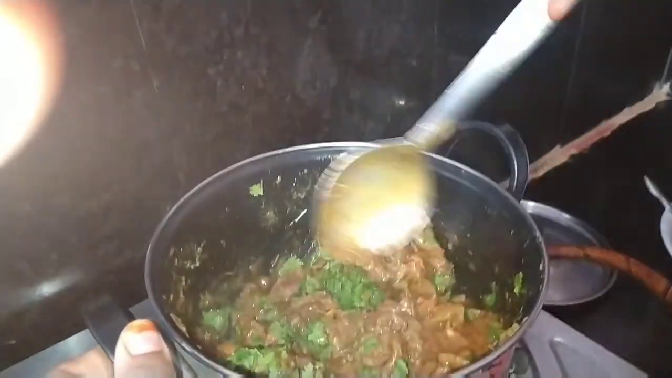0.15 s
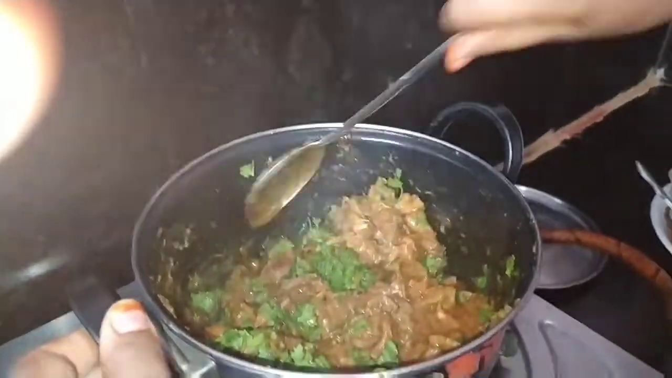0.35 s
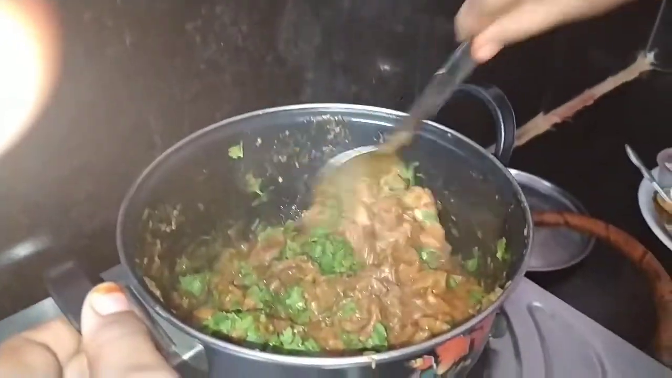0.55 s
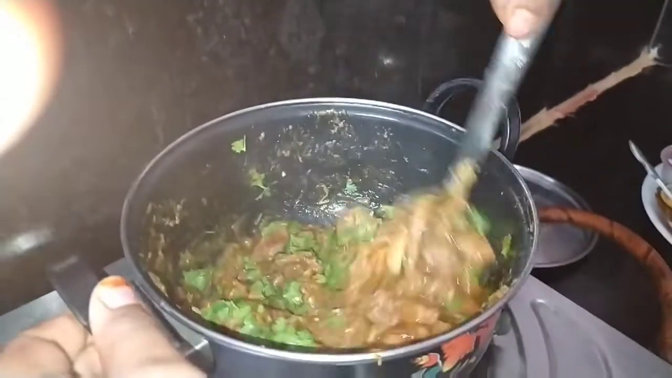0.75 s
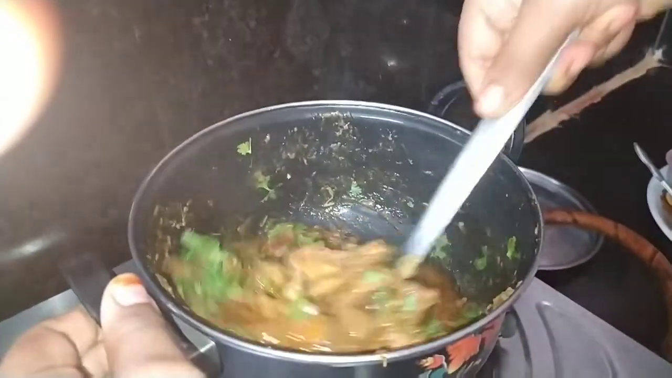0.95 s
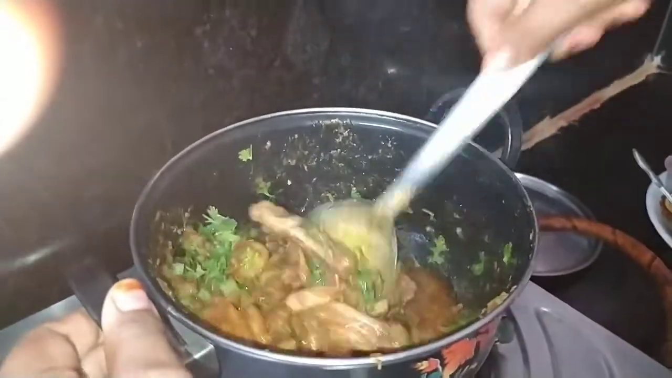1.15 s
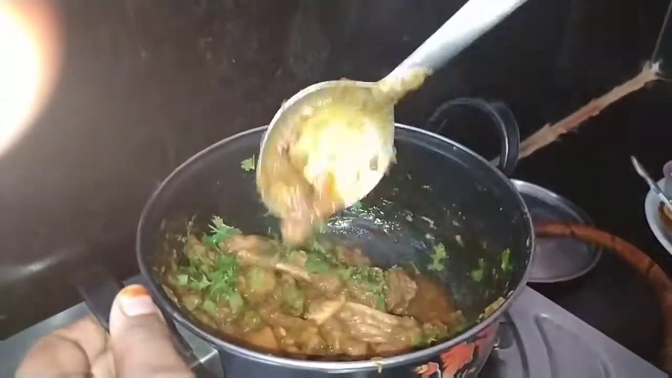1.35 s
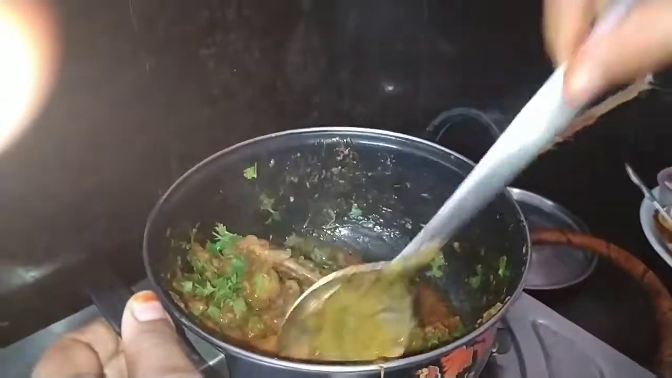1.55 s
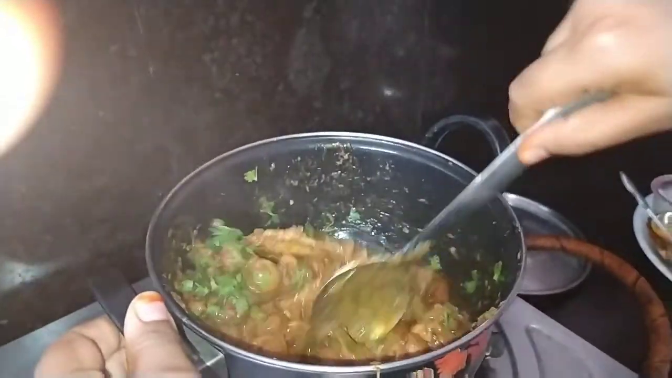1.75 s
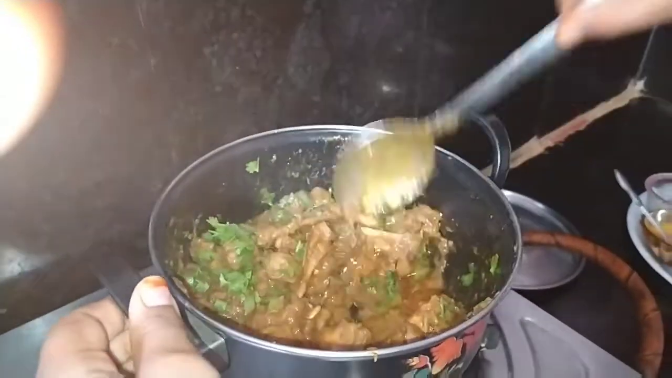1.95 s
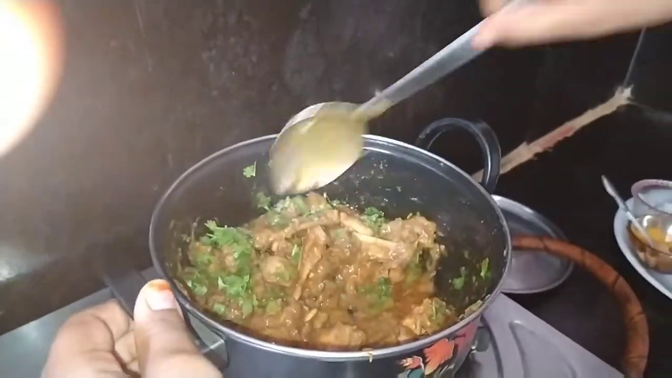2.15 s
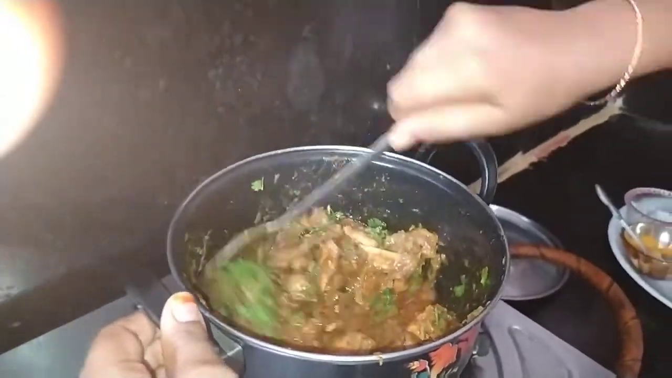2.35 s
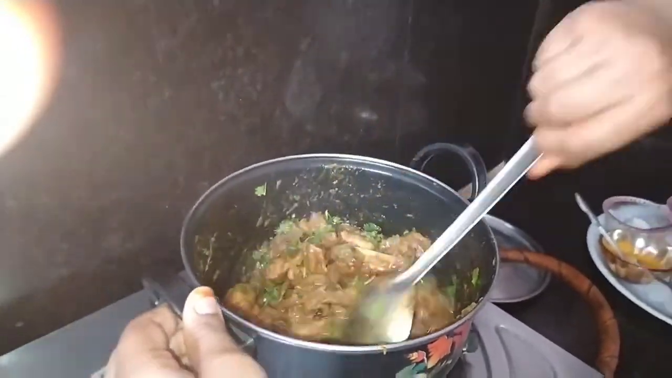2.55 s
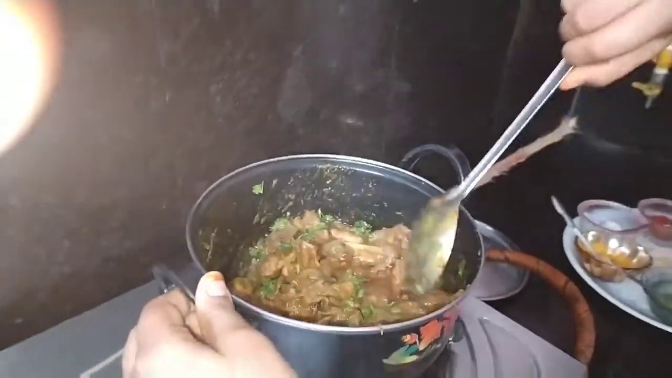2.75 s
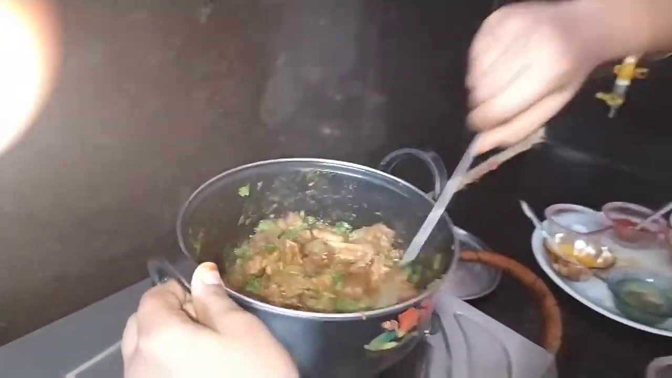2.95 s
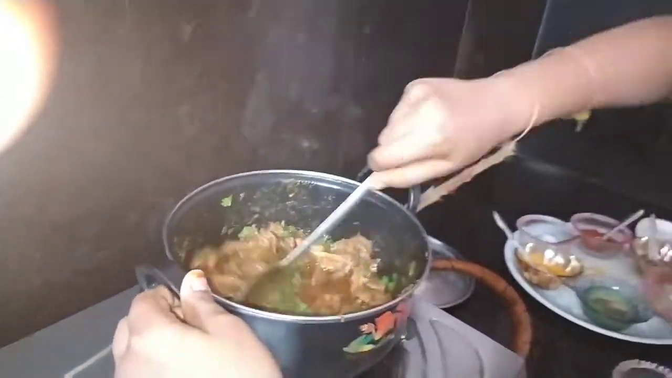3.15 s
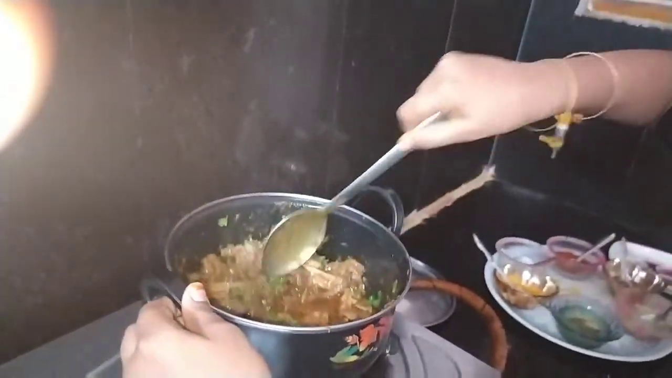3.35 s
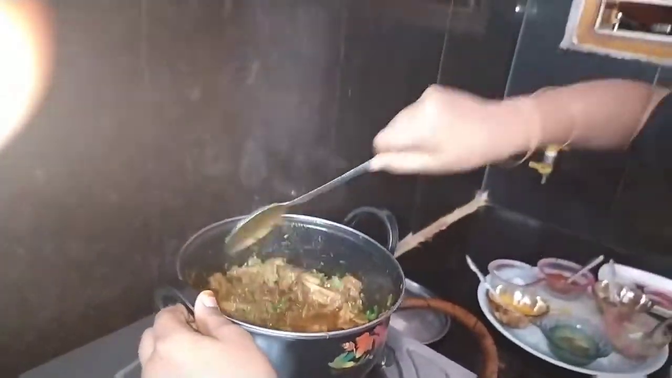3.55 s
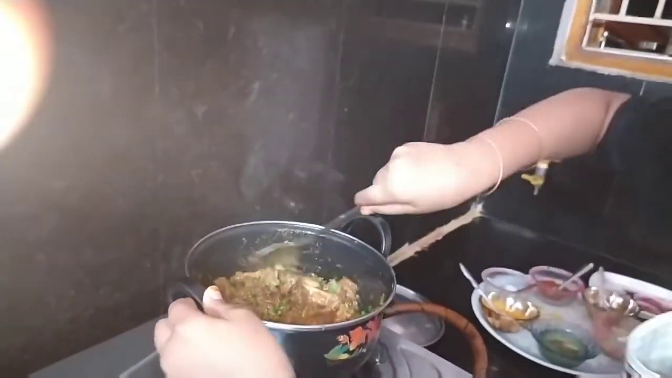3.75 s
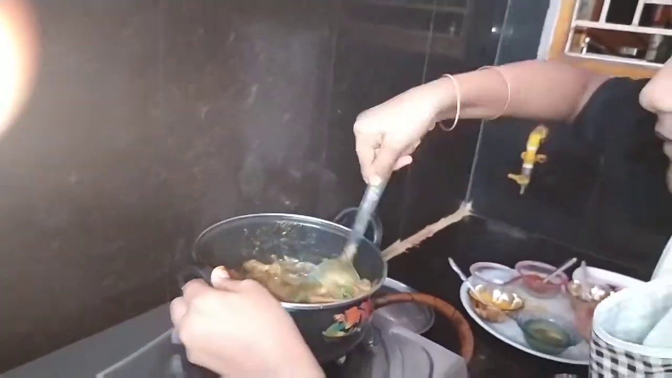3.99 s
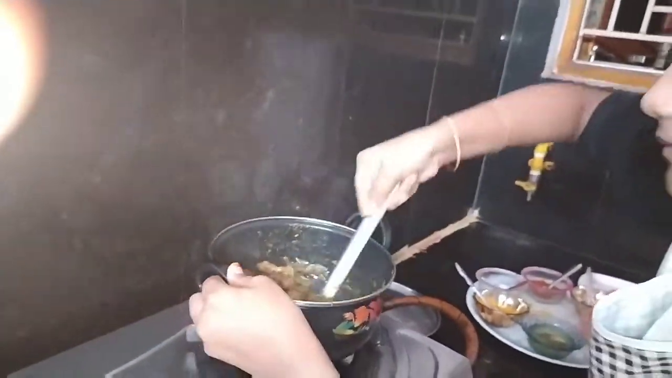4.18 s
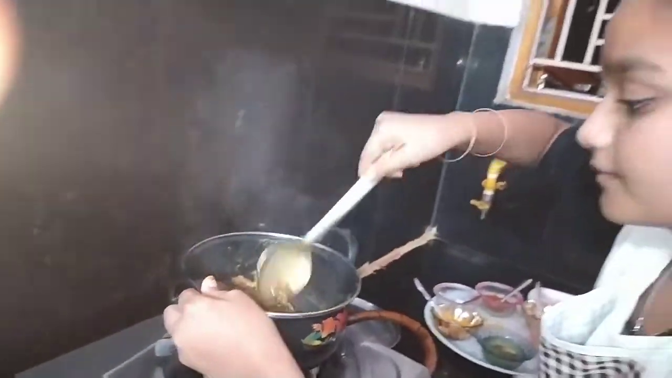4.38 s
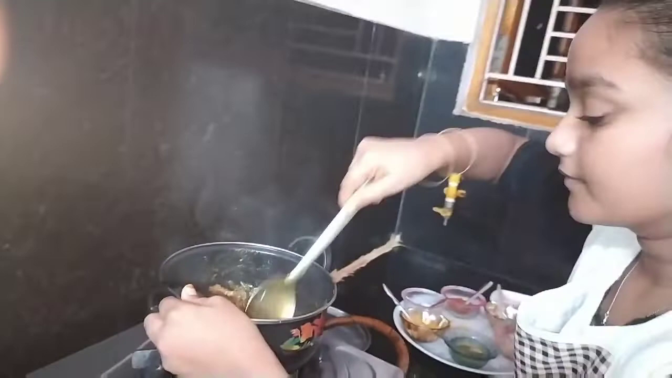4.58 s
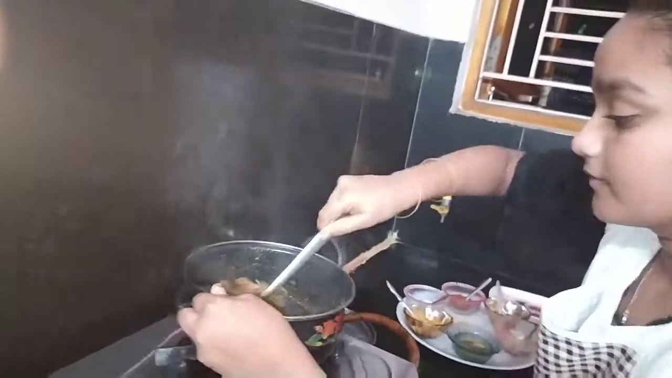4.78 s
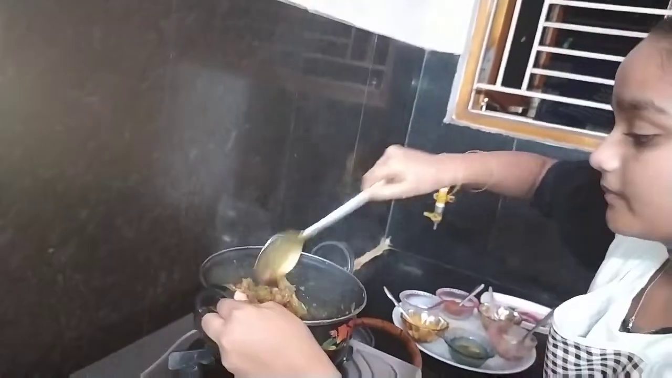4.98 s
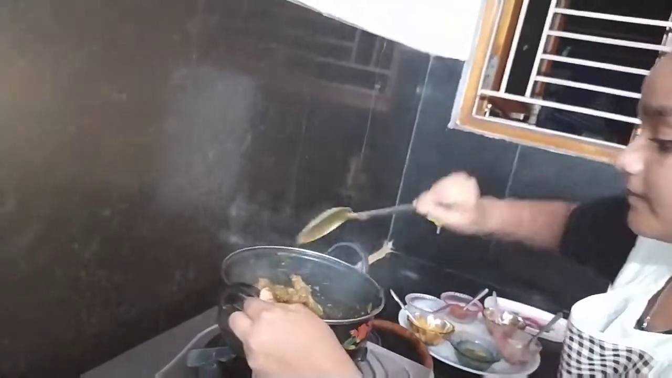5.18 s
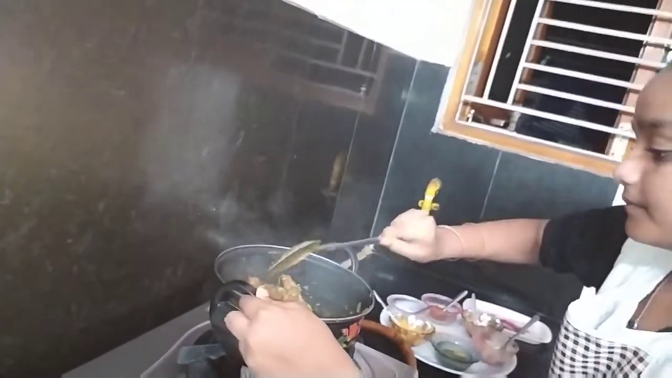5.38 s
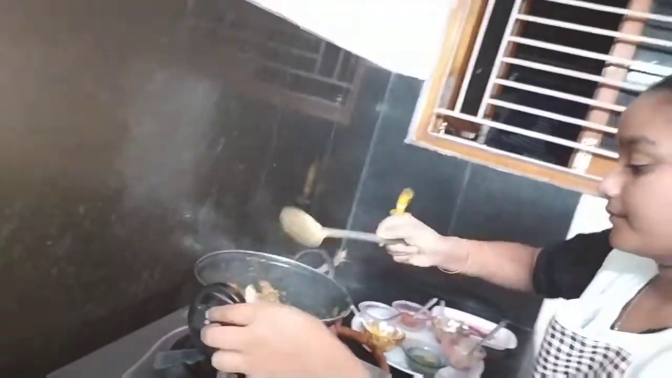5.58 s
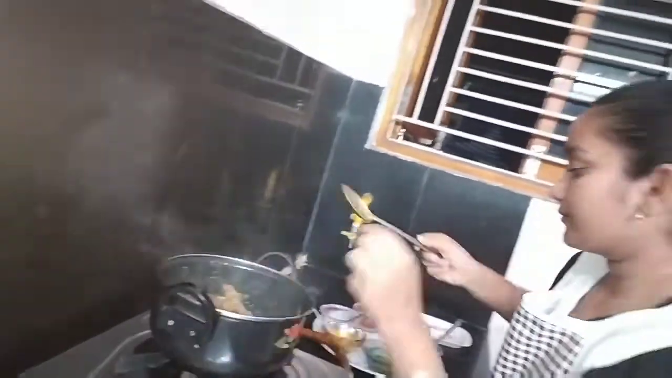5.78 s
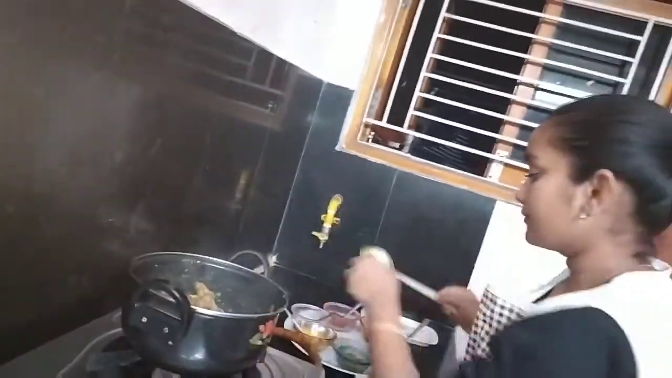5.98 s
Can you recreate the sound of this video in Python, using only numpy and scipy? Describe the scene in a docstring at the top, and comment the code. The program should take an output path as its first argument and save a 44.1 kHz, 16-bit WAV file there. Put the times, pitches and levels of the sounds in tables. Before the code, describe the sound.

A steel ladle stirs thick curry in a metal pan. Faint sticky smacks come first, then gritty scrapes and light clinks, a loud ringing knock just after two seconds, more drags and wet spits, then sparser knocks with soft pan thuds. Close stereo phone microphone in a tiled kitchen, stronger on the right, slowly backing away, over low hum and soft hiss.

```python
"""Faint sauce smacks over a low hum and soft hiss, then a steel ladle knocks and scrapes a metal pan of thick curry.
Knocks, scrapes and pan thuds excite banks of decaying modes of ladle, pan wall and pan base.
Smacks are short pitched noise spits, squeaks are narrow noise bands; a low push hits the right microphone once.
A tiled kitchen answers with sparse echoes; the air is shaped noise, the hum is drifting sines."""
import sys
import numpy as np
from scipy import signal
from scipy.fft import rfft, irfft, next_fast_len
from scipy.io import wavfile
from scipy.ndimage import uniform_filter1d

SR = 44100
rng = np.random.default_rng(int(sys.argv[2]) if len(sys.argv) > 2 else 0)


def materialize(psi):
    """Save the field psi as 16-bit PCM at rate SR to the path in sys.argv[1].

    A 1-D psi becomes a single channel; in a 2-D psi each row is a channel.
    """
    bounded = np.clip(np.atleast_2d(psi).T, -1, 1)
    quanta = np.round(bounded * 32767).astype(np.int16)
    wavfile.write(sys.argv[1], SR, quanta)


def level_to_linear(level):
    """Convert decibel levels to linear amplitude factors, elementwise."""
    exponent = np.asarray(level, float) / 20
    return 10 ** exponent


N = 265669  # samples


def evened(x):
    """Scales to an rms of 1."""
    return x / np.sqrt(np.mean(x ** 2) + 1e-20)


def crest(x, size=100):
    """Peak height as the ear takes it: from the power over a short window."""
    return 2.5 * np.sqrt(uniform_filter1d(x ** 2, size).max())


def read(points, hz):
    """Interpolates a curve over log frequency."""
    point_hz, value = np.transpose(points)
    return np.interp(np.log(hz + 1), np.log(point_hz + 1), value)


def add(mix, start_s, sound):
    """Adds a sound in place, cut at the end of the mix."""
    part = mix[..., round(start_s * SR):][..., :sound.shape[-1]]
    part += sound[..., :part.shape[-1]]


def pair(x, left_right_db):
    """Places a sound between the microphones by level."""
    return x * level_to_linear(np.array([[.5], [-.5]]) * left_right_db)


def ring(x, hz, width_hz):
    """One mode: a click of height 1 rings as a dying wave of height 1, with no steady part."""
    radius, turn = np.exp(-np.pi * width_hz / SR), 2 * np.pi * hz / SR
    poles = [1, -2 * radius * np.cos(turn), radius * radius]
    return signal.lfilter([.5, 0, -.5], poles, x) / max(np.sin(turn), 1 - radius)


def favoured(modes, loud_hz, favour_db=8.0, spread=0.12):
    """The spot of contact favours the modes near one pitch."""
    return [level_to_linear(db + favour_db * np.exp(-(np.log(hz / loud_hz) / spread) ** 2)) for hz, _, db in modes]


def facing(rings, flip):
    """Every other mode reaches the right port at another strength, sometimes with its sign turned."""
    left = rings.sum(0)
    return np.array([left, left - flip * rings[1::2].sum(0)])


def struck(modes, db, loud_hz, contact_ms, flip, favour_db=11.0):
    """A rattling contact sets each mode ringing, a little detuned by the sauce on the metal."""
    t = np.arange(round(.3 * SR)) / SR
    touch = rng.standard_normal((len(modes), len(t))) * t * np.exp(-1000 * t / contact_ms)
    detune = 1 + 0.0052 * rng.standard_normal(len(modes))
    rings = np.array([ring(x, hz * c, width) for x, c, (hz, width, _) in zip(touch, detune, modes)])
    rings /= np.linalg.norm(rings, axis=1)[:, None]
    size = [g * np.sqrt(1 / width) for g, (_, width, _) in zip(favoured(modes, loud_hz, favour_db), modes)]
    sides = facing(rings * np.c_[size], flip)
    return level_to_linear(db) * sides / crest(sides[0], size=round(contact_ms * 150))


# resting modes of ladle and pan wall: (pitch_hz, width_hz, relative_level_db)
LADLE = [(5130, 2100, 12), (5620, 260, -5), (6280, 120, -1.5), (6575, 125, -0.5), (6974, 570, 10.5),
         (7570, 290, 7.5), (8400, 330, -1), (9200, 69, -6.5), (8960, 1100, 6.5), (9800, 72, 3),
         (10270, 230, -3.5), (11500, 1200, 15.5), (13260, 1390, -43), (6690, 4100, 11)]
WALL = [(1237, 380, 9.5), (1600, 100, 9), (1860, 440, 12.5), (2210, 300, 15), (2540, 60, 3),
        (2852, 340, 20.5), (3456, 540, -0.5), (4210, 200, 11), (2000, 6650, 27)]
# ladle knocks: (start_s, ladle_level_db, wall_re_ladle_db, loudest_ladle_hz, loudest_wall_hz, left_right_db)
KNOCKS = [(0.8504, -14.5, 2, 9500, 1550, -4), (1.793, -20.5, -1.5, 9120, 2450, -1),
          (1.8262, -11, -1.5, 9560, 1240, 0.5), (2.213, -0.5, -3, 6910, 2390, 10),
          (2.9519, -8.5, 3.5, 8770, 2150, 3.5), (3.662, -14.5, -13, 9400, 1600, 3.5),
          (4.7394, -5, 1, 9620, 2300, 6), (5.7111, -25, 4, 9200, 1770, 0.5),
          (5.728, -22, -3, 10200, 1250, 3.5)]
KNOCK_ROOM_DB, ROOM_DB_PER_S = -9.5, 1.52  # the phone backs away: knocks grow roomier


def knocks():
    """Steel on steel rings ladle and pan wall at once."""
    for start_s, ladle_db, wall_db, ladle_hz, wall_hz, left_right_db in KNOCKS:
        ladle = struck(LADLE, ladle_db, ladle_hz, contact_ms=0.81, flip=1.43)
        wall = struck(WALL, ladle_db + wall_db, wall_hz, contact_ms=1.0, flip=0.95)
        yield start_s, pair(ladle + wall, left_right_db), KNOCK_ROOM_DB + ROOM_DB_PER_S * start_s


# resting modes of the pan base: (pitch_hz, width_hz, relative_level_db)
BASE = [(201, 30.2, -4), (258, 8.8, 7), (305.8, 12, 2), (338.8, 21, 7), (405, 65, -6), (500, 42, 10.5),
        (583, 23, 1.5), (688, 48, 9), (800, 88, 12), (916, 106, 16), (594, 810, 19)]
USUAL_DB = -49  # ladle level of usual pressure
SAUCE_DAMPING = 1.29  # how much wider the modes are under the sliding load
HOLLOW_DB = -10.5  # lowest pan modes under a stroke, re pan base


def stroke(rows, wall_db, wall_hz, base_db, wall_lags, grit_per_s=9000, grit_db=4.0):
    """Grit under the sliding rim: dense uneven clicks into the modes, detuned by the load of sauce."""
    s, level_db = np.transpose(rows)
    t = np.arange(s[0], s[-1] + .08, 1 / SR)
    n = len(t)
    db = np.interp(t, s, level_db)
    wall_db = wall_db - wall_lags * (db - USUAL_DB)
    grit = rng.standard_normal(n) * (rng.random(n) < grit_per_s / SR)
    grit *= level_to_linear(grit_db * np.minimum(rng.exponential(1, n), 2))
    judder = level_to_linear(0.75 * evened(uniform_filter1d(rng.standard_normal(n), 400)))  # the rim sticks and slips
    touch = np.clip((t - s[0]) / 0.0011, 0, 1) * np.clip((s[-1] - t) / 0.0081, 0, 1)
    parts = [(LADLE, 0, 9500, 1.6), (WALL, wall_db, wall_hz, 1.6),
             (BASE[5:], wall_db + base_db, 650, .9), (BASE[1:4], wall_db + base_db + HOLLOW_DB, 300, .2)]
    out = np.zeros((2, n))
    for modes, rel_db, loud_hz, flip in parts:
        # the moving rim finds other modes
        wander = evened(uniform_filter1d(rng.standard_normal((len(modes), n)), 1500, axis=1))
        gains = [g * level_to_linear(4 * v) for g, v in zip(favoured(modes, loud_hz), wander)]
        widths = [width * SAUCE_DAMPING for _, width, _ in modes]
        energy = sum(g ** 2 * SR / (4 * np.pi * width) for g, width in zip(gains, widths))
        drive = evened(grit * judder) * touch * level_to_linear(db + rel_db) / np.sqrt(energy)
        detune = 1 + 0.028 * rng.standard_normal(len(modes))
        rings = [ring(drive * g, mode[0] * c, width) for g, c, mode, width in zip(gains, detune, modes, widths)]
        out += facing(np.array(rings), flip)
    return out


# long drags along the pan, pressure as it is heard: per drag, rows of (time_s, ladle_level_db)
DRAGS = [
    [(.665, -47.5), (.695, -39.5), (.72, -48.5), (.762, -45.5), (.775, -42), (.805, -36), (.83, -47.5),
     (.865, -54), (.9, -66), (.95, -47.5), (1.016, -48.5), (1.09, -73), (1.38, -70.5)],
    [(2.26, -48), (2.34, -44), (2.358, -34.5), (2.412, -40), (2.425, -31.5), (2.47, -30)],
    [(2.965, -44), (3.0, -53.5), (3.018, -34.5), (3.04, -51.5), (3.09, -41), (3.105, -43), (3.15, -41),
     (3.2, -66), (3.26, -66)],
    [(3.958, -46), (4.01, -50.5), (4.09, -43), (4.115, -56), (4.13, -44), (4.22, -51.5), (4.3, -66)],
]
# spot of each drag: (wall_re_ladle_db at usual pressure, loudest_wall_hz, base_re_wall_db)
DRAG_SPOTS = [(-5.5, 1880, -17.5), (-9, 2700, -35.5), (-6.5, 1950, -15.5), (-5.5, 1810, -21)]


def drags():
    """Long strokes; pressed harder than usual, the wall gains less than the ladle."""
    for rows, spot in zip(DRAGS, DRAG_SPOTS):
        yield rows[0][0], stroke(rows, *spot, wall_lags=0.22), -7


# short swipes of the rim: (start_s, length_s, ladle_level_db, wall_re_ladle_db, loudest_wall_hz)
SWIPES = [(0.516, 0.09, -38, -17, 2600), (.643, .018, -20.5, -21, 2780), (1.574, 0.059, -54.5, -8.5, 2000),
          (1.668, 0.036, -50, -6.5, 2560), (2.576, 0.056, -24, -18, 2860), (3.678, 0.021, -52, -5.5, 1660),
          (3.854, 0.07, -46, -8.5, 1460), (4.378, .07, -58, -13, 1760), (4.537, 0.18, -49.5, -23.5, 1380),
          (4.978, .09, -58.5, -9, 2000)]
SWIPE_PEAK = 0.26  # share of the length at which it is loudest
SWIPE_RISE_DB, SWIPE_FADE_DB = -5.5, -4.5  # start and end, re peak


def swipes():
    """A short stroke swells quickly and fades."""
    for start_s, length_s, db, wall_db, wall_hz in SWIPES:
        rows = [(start_s, db + SWIPE_RISE_DB),
                (start_s + SWIPE_PEAK * length_s, db),
                (start_s + length_s, db + SWIPE_FADE_DB)]
        yield start_s, stroke(rows, wall_db, wall_hz, base_db=-26.0, wall_lags=0), -7


# faint smacks while sauce slides off the lifted ladle: (start_s, end_s, count)
DRIPPING = [(.12, .5, 4), (1.14, 1.77, 7), (3.27, 3.46, 5), (4.33, 4.46, 2)]
DRIP_DB, DRIP_SPREAD_DB, DRIP_HZ = -50, 2.5, 9000


def drips():
    """Times, levels and pitches of faint smacks, by chance."""
    rows = []
    for start_s, end_s, count in DRIPPING:
        for _ in range(count):
            level_db = DRIP_DB + DRIP_SPREAD_DB * rng.standard_normal()
            pitch_hz = DRIP_HZ * (1 + .07 * rng.standard_normal())
            rows.append((rng.uniform(start_s, end_s), level_db, pitch_hz))
    return rows


# the clearest smacks of sticky sauce: (start_s, level_db, pitch_hz)
SMACKS = [(.2354, -36.5, 7970), (0.585, -23.5, 9800), (0.689, -29, 8600), (0.701, -32, 4850),
          (.834, -31.5, 8400), (1.137, -39, 4500), (1.189, -43.5, 8900), (1.247, -37, 2830),
          (1.295, -34, 6000), (1.304, -36, 4670), (1.377, -42, 8600), (1.582, -36.5, 9800),
          (1.615, -35.5, 10000), (1.665, -36, 8150), (1.680, -32, 9800), (1.893, -31.5, 7860),
          (1.988, -39.5, 9900), (2.669, -34.5, 9800), (3.015, -17, 6850), (3.103, -23, 9400),
          (3.239, -35.5, 8750), (3.5751, -42.5, 9300)]


def smacks():
    """Sauce lets go of the steel: a short wet spit with one pitch standing out."""
    t = np.arange(round(.015 * SR)) / SR
    for start_s, db, hz in SMACKS + drips():
        spit = rng.standard_normal(len(t)) * t * np.exp(-t / .0011)
        pop = evened(ring(spit, hz, hz / 29)) + 0.92 * evened(ring(spit, 6600, 7000))
        yield start_s, pair(level_to_linear(db) * pop / crest(pop), -1.5), -11


# the pan thuds on its stand: (start_s, level_before_lowpass_db, loudest_hz, contact_ms)
THUDS = [(0.433, -37.5, 256, 12), (.699, -30, 540, 4.2), (.851, -31, 510, 5), (1.074, -23.5, 262, 6),
         (1.076, -32, 650, 9.5), (1.826, -20.5, 326, 4.5), (2.214, -24.5, 700, 3.4), (2.95, -31, 680, 5),
         (3.662, -36.5, 787, 3.4), (3.688, -37.5, 258, 6), (4.162, -35.5, 298, 4.5),
         (4.74, -28.5, 700, 5.8), (5.711, -24.5, 653, 5.6), (5.724, -19.5, 257, 5.1), (5.946, -39, 500, 8)]
THUD_FAVOUR_DB, THUD_TOP_HZ = 12.5, 1300


def thuds():
    """A soft, broad contact reaches only the low modes of the pan."""
    lowpass = signal.butter(2, THUD_TOP_HZ, fs=SR)
    for start_s, db, hz, contact_ms in THUDS:
        rung = struck(BASE, db, hz, contact_ms, flip=0.52, favour_db=THUD_FAVOUR_DB)
        yield start_s, signal.lfilter(*lowpass, rung), -1.5


# the rim squeaks as it sticks and slips evenly: (start_s, end_s, pitch_hz, level_db)
SQUEAKS = [(0.529, 0.596, 1600, -49.5), (.522, 0.601, 3120, -49), (2.351, 2.386, 4900, -43),
           (2.429, 2.46, 4830, -40.5), (3.876, 3.907, 1490, -66), (4.56, 4.717, 5090, -67.5),
           (4.567, 4.717, 8930, -56.5), (4.608, 4.72, 10100, -68)]


def squeaks():
    """A narrow, fluttering band of slips."""
    for start_s, end_s, hz, db in SQUEAKS:
        n = round((end_s - start_s) * SR)
        tone = evened(ring(rng.standard_normal(n), hz, width_hz=105)) * signal.windows.tukey(n, .3)
        yield start_s, pair(level_to_linear(db) * tone, -2.3), -9


JOLT_S = 2.2155  # a low push reaches the right microphone
JOLT_DB, JOLT_MS, WOBBLE_DB = -16, 5.5, -20


def jolt():
    """One slow swing of the membrane, down and back, with a falling wobble on its front."""
    t = np.arange(SR // 3) / SR
    u = np.maximum(t - .003, 0) * 1000 / JOLT_MS
    swing = np.e * (0.017 * u * u * np.exp(-u / 3.8) - u * np.exp(-u))
    wobble = np.sin(2 * np.pi * (110 * t + 3.8 * (1 - np.exp(-t / 0.0054)))) * np.exp(-t / 0.015)
    return level_to_linear(JOLT_DB) * swing + level_to_linear(WOBBLE_DB) * wobble


# decay of the tiled kitchen: (pitch_hz, t60_s)
KITCHEN = [(200, 0.38), (600, 0.57), (1500, 0.38), (4000, 0.41), (9000, 0.32), (15000, 0.34)]


def kitchen(x):
    """Sparse echoes of random sign, each band dying at its own speed; three sets crossfade at a steady rate."""
    taps = np.zeros((3, 2, SR // 2))
    at = np.arange(120, SR // 2 - 20, 20) + rng.integers(0, 20, (3, 2, (SR // 2 - 121) // 20))
    np.put_along_axis(taps, at, rng.choice([-1., 1.], at.shape), 2)
    hz, t, z = signal.stft(taps, SR, nperseg=256)
    same = 1 / (1 + (hz[:, None] / 450) ** 2)  # long waves reach both ports alike
    z[:, 1] = same * z[:, 0] + np.sqrt(1 - same ** 2) * z[:, 1]
    decay = level_to_linear(-60 * t / read(KITCHEN, hz)[:, None])
    tail = signal.istft(z * decay, SR, nperseg=256)[1]
    turn = np.arange(N) / SR * 40 + np.arange(3)[:, None, None] * np.pi / 3  # 40 rad/s
    shares = np.sqrt(2 / 3) * np.cos(turn)
    return signal.fftconvolve(x * shares, tail / np.linalg.norm(tail[0, 0]), axes=2).sum(0)[:, :N]


# colour of the ports: (pitch_hz, left_right_db)
PORTS = [(60, -8.5), (250, -4.5), (600, -3.5), (1500, -12.5), (4000, -14), (6500, -12.5), (9000, -22.5),
         (12000, -11), (16000, -14.5)]
LAG = 9  # samples the left microphone hears later


def ports(x):
    """The two microphone ports differ in colour, and the left one is farther from the pan."""
    size = next_fast_len(N)
    hz = np.fft.rfftfreq(size, 1 / SR)
    delay = np.exp(-2j * np.pi * hz * np.array([[LAG], [0]]) / SR)
    return irfft(rfft(x, size) * pair(delay, read(PORTS, hz)), size)[:, :N]


# air spectrum: (pitch_hz, relative_density_db)
AIR = [(20, -4.5), (60, -5.5), (85, -32.5), (105, -6.5), (135, -6.5), (175, -1.5), (225, -9.5), (290, -2),
       (400, -10), (900, -15), (2500, -21.5), (4500, -29), (6500, -30), (9000, -24), (12000, -31.5),
       (16000, -40)]
AIR_DB = -54  # rms over both sides
# left-right likeness of the air: (pitch_hz, correlation)
AIR_SAME = [(60, 0.23), (240, 0.99), (950, 0.16), (3770, -0.013), (15000, -0.14)]
# balance of the air: (pitch_hz, left_right_db)
AIR_PORTS = [(60, -4), (500, 1), (1600, -3.5), (5000, -5.5), (9000, -9), (14000, -2)]


def air(patchy_db=.9):
    """Quiet room air and simmering hiss as random short-time spectra."""
    frames, hz = N // 512 + 5, np.fft.rfftfreq(2048, 1 / SR)
    a, b, c, d, patches = rng.standard_normal((frames, 1025, 5)).T
    patches = evened(uniform_filter1d(uniform_filter1d(patches, 30, 0), 6, 1))
    same = np.clip(read(AIR_SAME, hz), -1, 1)[:, None]
    left = a + 1j * b
    right = same * left + np.sqrt(1 - same ** 2) * (c + 1j * d)
    z = np.array([left, right]) * level_to_linear(read(AIR, hz)[:, None] + patchy_db * patches)
    z *= level_to_linear(np.array([.5, -.5])[:, None, None] * read(AIR_PORTS, hz)[:, None])
    return level_to_linear(AIR_DB) * evened(signal.istft(z, nperseg=2048, noverlap=1536)[1][:, :N])


# wavering tones, drifting by 0.32 widths rms: (pitch_hz, width_hz, level_db)
HUM = [(104.5, 8, -62), (283.8, 5.1, -63)]


def hum():
    """Steady tones whose pitch drifts a little, all together."""
    drift = evened(uniform_filter1d(rng.standard_normal(N), 2000))
    out = np.zeros(N)
    for hz, width_hz, db in HUM:
        phase = 2 * np.pi * np.cumsum(hz + width_hz * 0.32 * drift) / SR
        out += level_to_linear(db) * np.sqrt(2) * np.sin(phase)
    return out


def scene():
    """Sums the pan sounds near and in the room, then adds air, hum and the jolt."""
    near, sent = np.zeros((2, 2, N))
    for source in (knocks, thuds, swipes, drags, squeaks, smacks):
        for start_s, sound, room_db in source():
            add(near, start_s, sound)
            add(sent, start_s, level_to_linear(room_db) * sound)
    mix = ports(near + kitchen(sent)) + air() + hum()
    add(mix[1], JOLT_S, jolt())
    return mix


def low_pass(x):
    """Removes everything above the highest recorded frequency."""
    return signal.sosfilt(signal.butter(12, 16830, fs=SR, output="sos"), x)


def record(dry):
    """The recorder clips at full scale."""
    clipped = np.clip(dry, -1, 1)
    return low_pass(clipped)


dry = scene()
out = record(dry)
materialize(out)
```